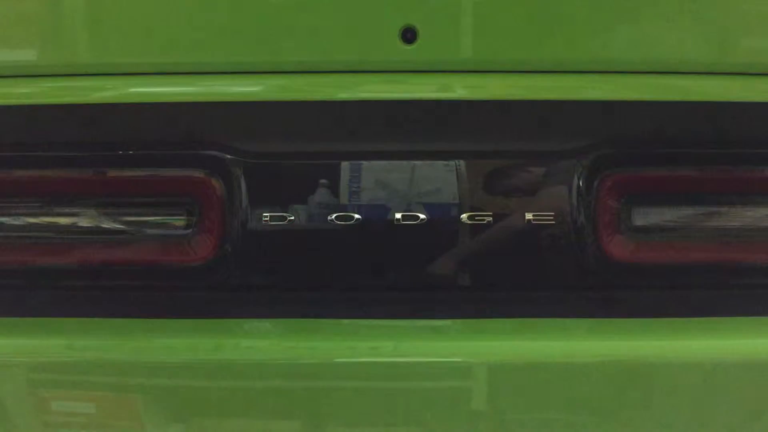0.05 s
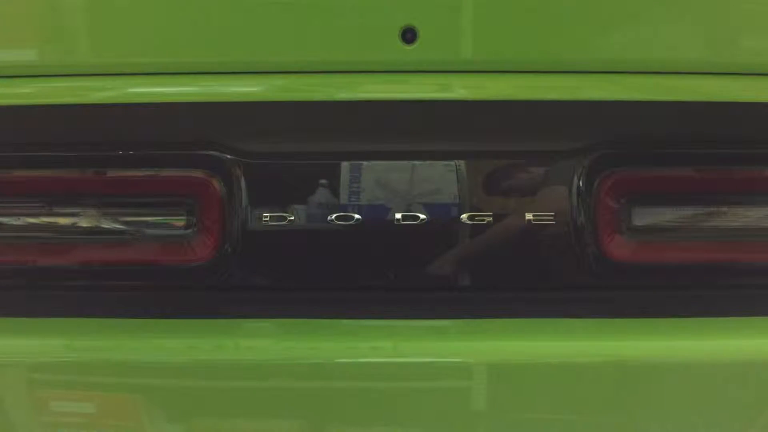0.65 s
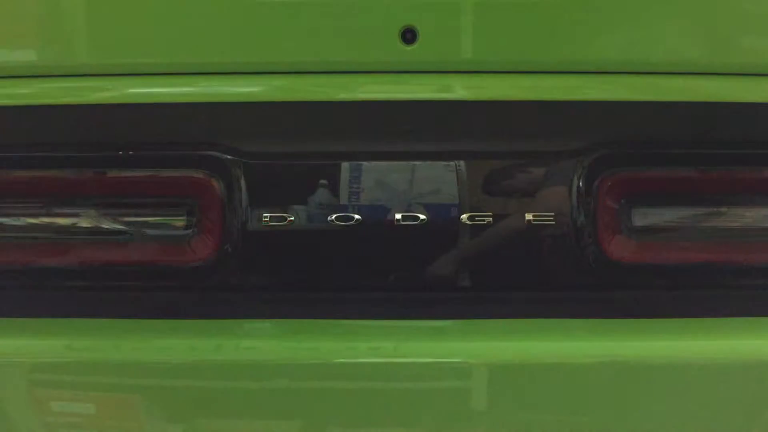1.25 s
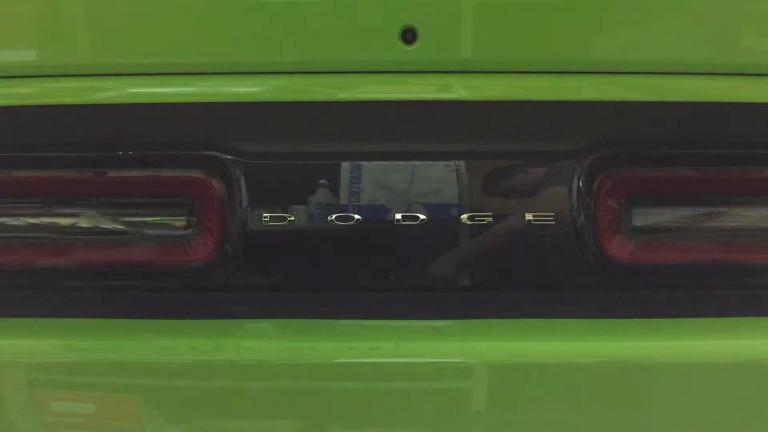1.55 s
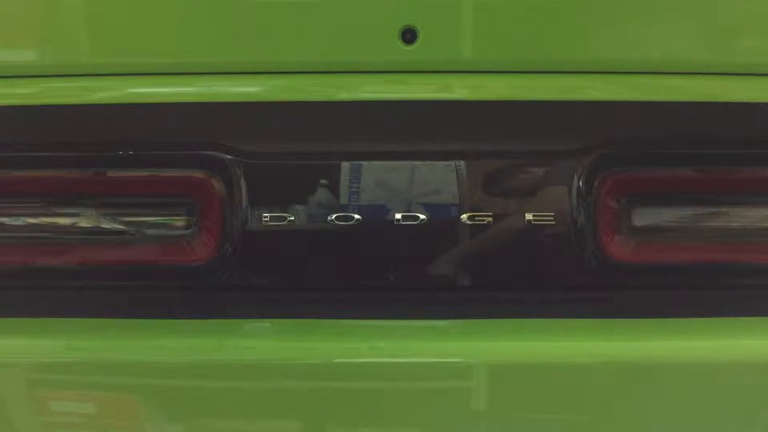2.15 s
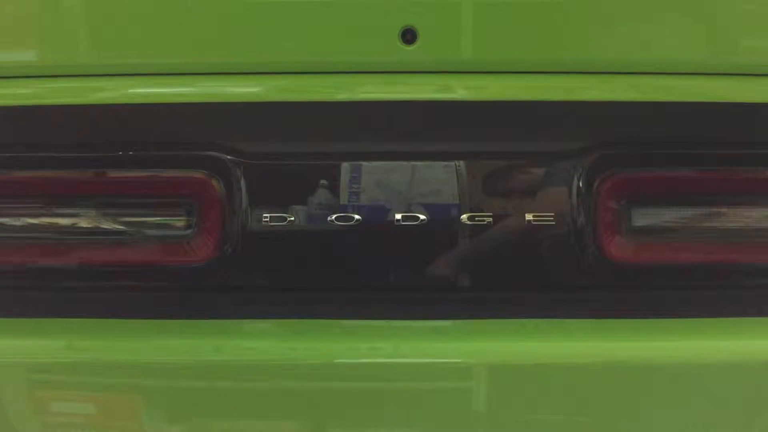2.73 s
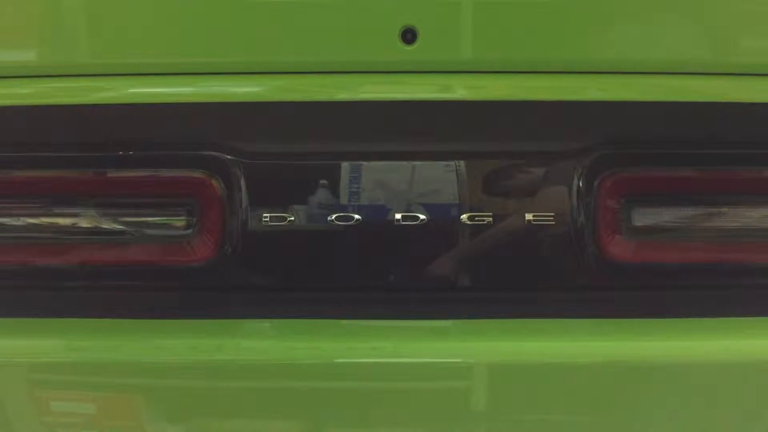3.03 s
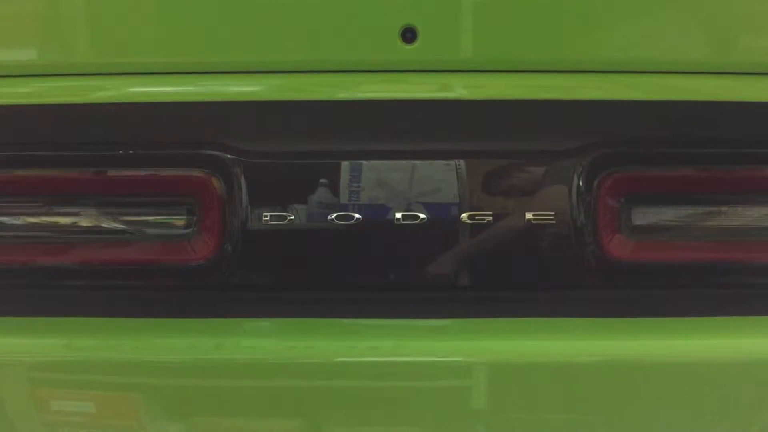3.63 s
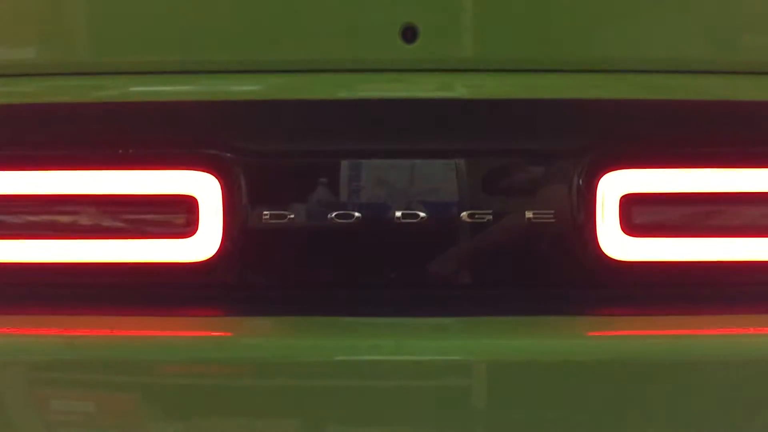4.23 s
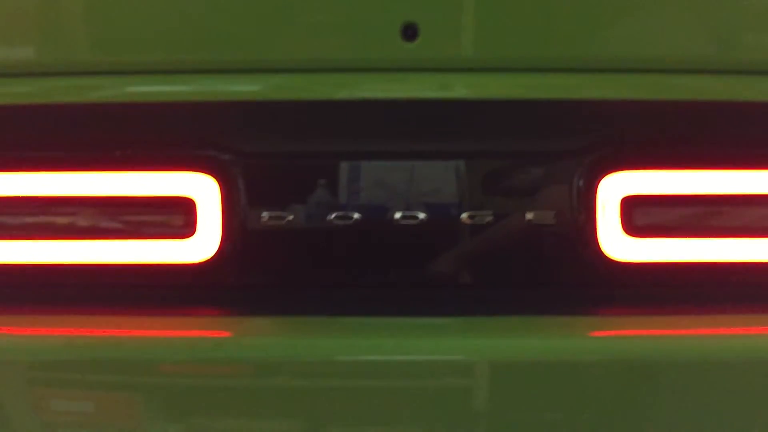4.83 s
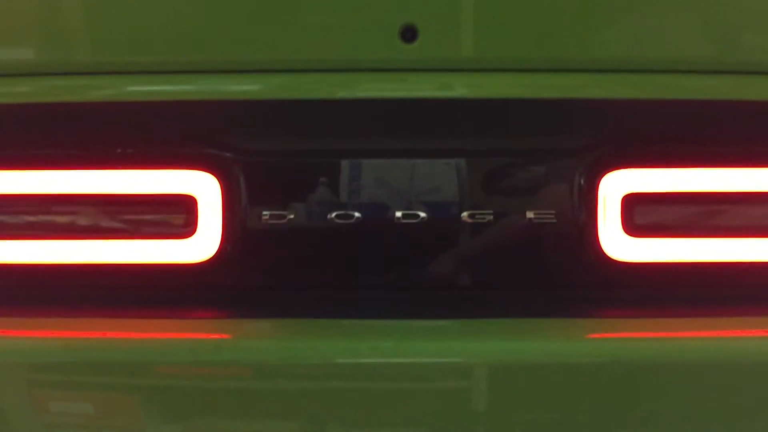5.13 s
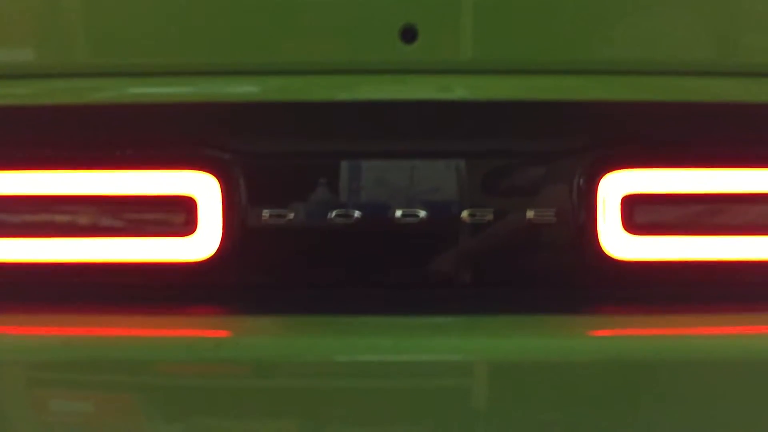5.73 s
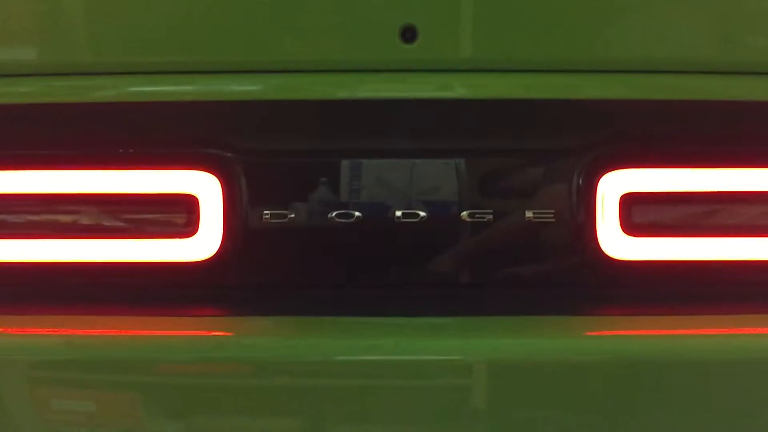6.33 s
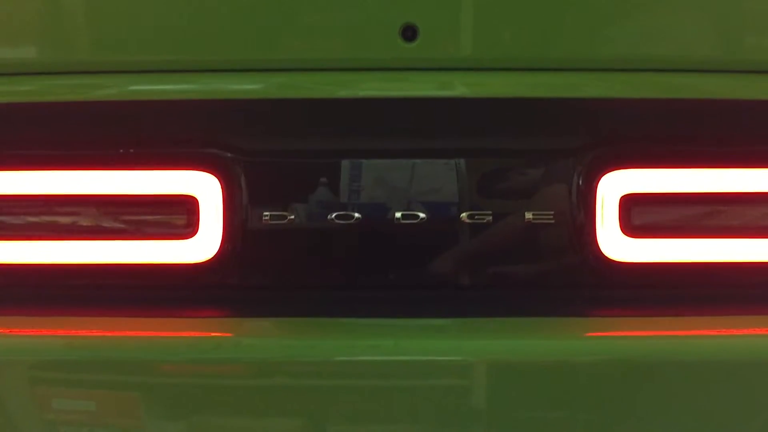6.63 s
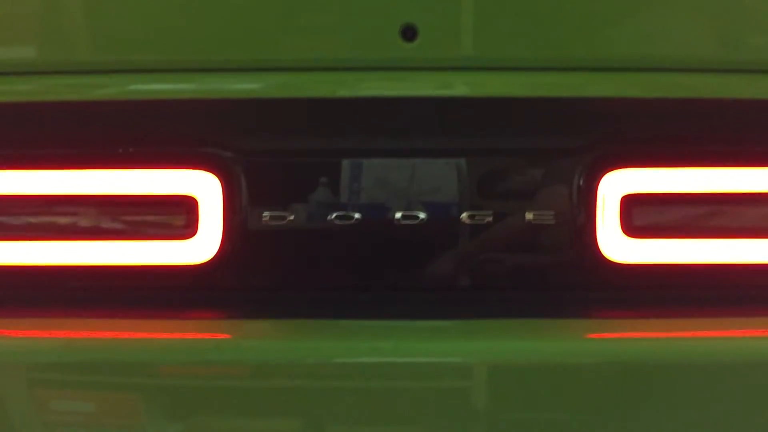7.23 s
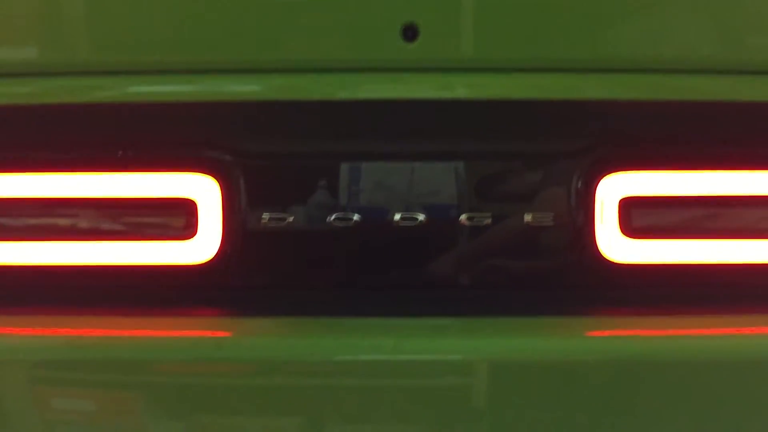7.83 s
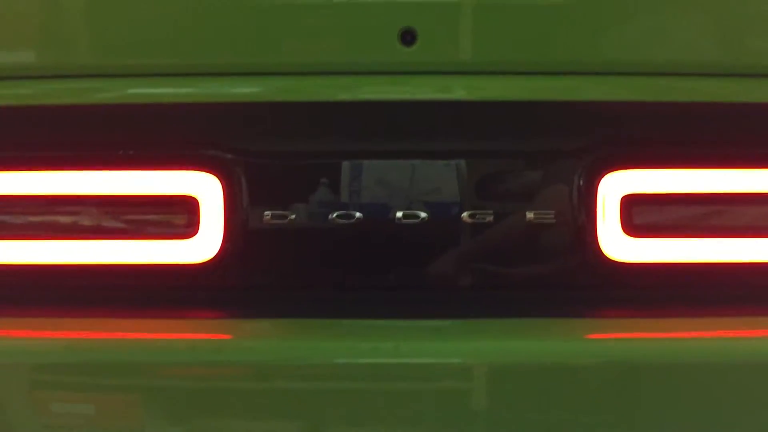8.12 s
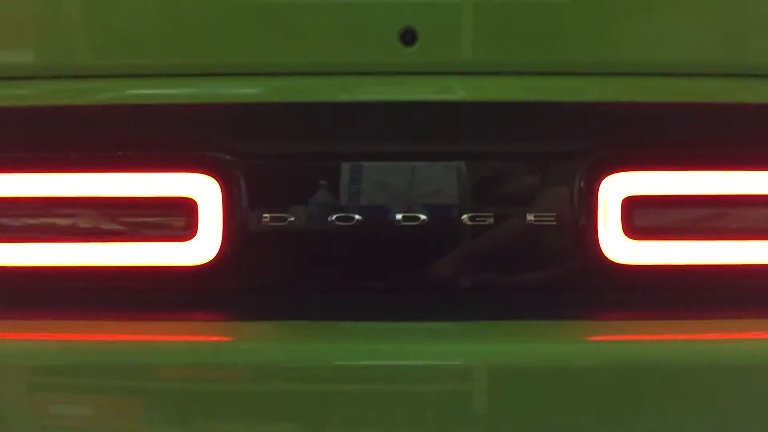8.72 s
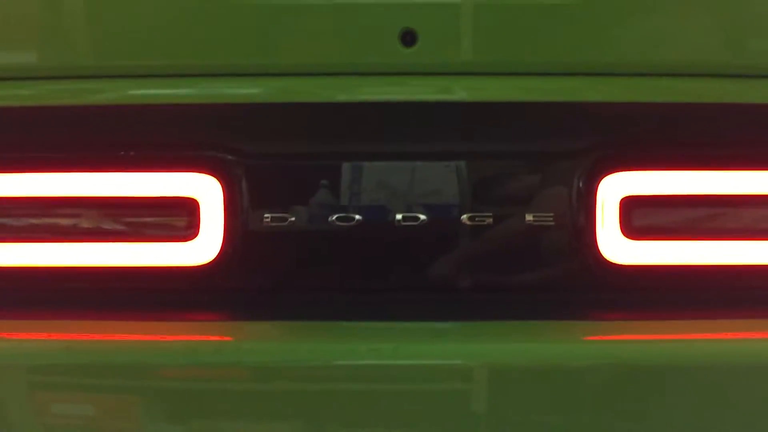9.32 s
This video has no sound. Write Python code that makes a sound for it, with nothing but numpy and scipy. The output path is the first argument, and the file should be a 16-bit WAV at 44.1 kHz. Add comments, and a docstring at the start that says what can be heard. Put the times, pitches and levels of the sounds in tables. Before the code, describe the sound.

A V8 car starts from cold, heard close behind the exhaust. At first there is only faint air, a high electrical whine and a low swelling drone. Then comes a clack and a short grinding crank, cut through by a burst of bassy, slightly distorted bangs. The engine surges, falls back and holds a loping, throaty fast idle that wavers gently in speed.

```python
"""A V8 car starts from cold, heard from just behind its tail. Over a quiet hum the electrics wake with a
swish and a thin whine, and a low drone swells. The starter clacks in and its gears grind through five
compressions. The first rich firings bang down the pipes and overload the microphone. Then the revs flare
and sink to a booming fast idle, whose strong cylinders rasp once every engine cycle."""
import sys
import numpy as np
from scipy import signal
from scipy.fft import rfft, irfft
from scipy.io import wavfile
from scipy.ndimage import uniform_filter1d

SR = 44100
rng = np.random.default_rng(int(sys.argv[2]) if len(sys.argv) > 2 else 0)


def file_out(sig):
    """Save sig as 16-bit WAV at sys.argv[1]."""
    # one column per channel
    cols = np.atleast_2d(sig).T
    # limit, then scale
    lim = np.clip(cols, -1, 1)
    pcm = np.round(lim * 32767).astype(np.int16)
    wavfile.write(sys.argv[1], SR, pcm)


N = 422037
T = np.arange(N) / SR


def undb(db):
    """Decibels to gain."""
    return 10 ** (np.asarray(db) / 20)


def unit(x):
    """Scale to rms 1."""
    return x / np.sqrt(np.mean(x ** 2))


def noise():
    """White noise."""
    return rng.standard_normal(N)


def curves(rows):
    """Each column of a table, joined by straight lines in time."""
    s, *columns = np.transpose(rows)
    return [np.interp(T, s, c) for c in columns]


def drift(rate):
    """A random wander of rms 1, with `rate` new values a second."""
    return unit(np.interp(T * rate, np.arange(4000), rng.standard_normal(4000)))


def swells(rows):
    """Smooth rises and dips of level in dB, summed."""
    return sum(db * np.exp(-((T - s) / half) ** 2) for s, half, db in rows)


def burst(s, rise, decay):
    """Envelope of a blow."""
    age = np.maximum(T - s, 0)
    return (1 - np.exp(-age / rise)) * np.exp(-age / decay)


def gate(start, attack, end, release):
    """Straight attack, hold, exponential release."""
    return np.clip((T - start) / attack, 0, 1) * np.exp(-np.maximum(T - end, 0) / release)


def tone(hz):
    """A sine that follows a pitch curve."""
    return np.sin(2 * np.pi * np.cumsum(hz) / SR)


def ring(x, hz, width_hz):
    """One resonance, gain 1 at its centre."""
    return signal.lfilter(*signal.iirpeak(hz, hz / width_hz, SR), x)


def steep(x, modes):
    """Resonances passed twice, with dark valleys between them."""
    return sum(undb(db) * ring(ring(x, hz, width), hz, width) for hz, width, db in modes)


def band(hz, width_hz):
    """A steep band of noise, rms 1."""
    return unit(ring(ring(noise(), hz, width_hz), hz, width_hz))


def highpass(x, hz):
    """Steep bass cut."""
    return signal.sosfilt(signal.butter(4, hz, "high", fs=SR, output="sos"), x)


def colour(x, points, size=2048):
    """Minimum-phase EQ through (Hz, dB) points; white noise keeps its level."""
    hz, db = np.transpose(points)
    f = np.maximum(np.arange(size // 2 + 1) * SR / size, 1)
    bass_rolloff = 1 + (hz[0] / f / 2) ** 2
    gain = unit(undb(np.interp(np.log(f), np.log(hz), db)) / bass_rolloff)
    cepstrum = irfft(np.log(gain))
    cepstrum[1:size // 2] *= 2
    cepstrum[size // 2 + 1:] = 0
    return signal.fftconvolve(x, irfft(np.exp(rfft(cepstrum))))[:N]


def walls(x, t60, wet_db):
    """Scattered echoes from the ground and nearby walls."""
    age = T[:SR // 2]
    tail = rng.standard_normal(len(age)) * np.exp(-np.log(1000) * age / t60) * (age > .004)
    return x + undb(wet_db) * signal.fftconvolve(x, tail / np.sqrt(np.sum(tail ** 2)))[:N]


# The dark bed of air. Each row: frequency in Hz, relative level in dB.
AIR_EQ = [(60, -1.5), (114, 0), (171, -17.5), (250, -1.5), (500, -16.5), (930, -9.5), (1550, -22),
          (1730, -14.5), (1900, -24), (3200, -26), (6000, -36.5), (14000, -42)]
# Background hums. Each row: centre in Hz, filter width in Hz, level in dB.
HUMS = [(96.2, 13, -55), (109.3, 9.3, -70.5), (245.2, 6.6, -65), (517, 11, -68.5)]
# The swell of the low drone. Each row: time in seconds, level in dB.
DRONE_SWELL = [(1.2, -64), (2.0, -52.5), (2.4, -46), (3.2, -49.5)]
# Scuffs and ticks. Each row: start and length in seconds, centre and filter width in Hz, level in dB.
SCUFFS = [(0.09, 0.058, 352, 60, -47.5), (0.322, 0.088, 1750, 510, -52.5), (1.174, 0.11, 2880, 910, -55),
          (1.253, 0.19, 2440, 1490, -55.5), (2.705, 0.075, 2860, 795, -61),
          (7.448, 0.056, 7840, 1220, -52.5), (7.662, 0.059, 8200, 1800, -51.5)]


def surroundings():
    """Still air, steady hums, a swelling drone and a few faint scuffs and ticks."""
    bed = undb(-53 + 0.78 * drift(5.28)) * colour(noise(), AIR_EQ)
    for hz, width, db in HUMS:
        bed += undb(db) * band(hz, width)
    drone = unit(tone(53.3 + 1.75 * drift(2.1)) * undb(2 * drift(9.9)))
    bed += undb(curves(DRONE_SWELL)[0]) * drone
    for s, length, hz, width, db in SCUFFS:
        bed += undb(db) * band(hz, width) * np.sin(np.pi * np.clip((T - s) / length, 0, 1))
    return bed


# The soft opening swish. Each row: frequency in Hz, relative level in dB.
SWISH_EQ = [(300, 0), (750, 5), (1200, -1), (15000, -22.5)]
# The thin whine of the electrics. Each row: pitch in Hz, relative level in dB.
WHINE_TONES = [(3903, -68), (7850, -76.5), (11192, -75), (11531, -68), (11951, -97), (12161, -85),
               (13114, -79)]


def electrics():
    """The electrics wake: a short swish, then a wavering whine that stops before cranking."""
    swish = undb(-45) * colour(noise(), SWISH_EQ) * np.interp(T, [.13, .2, .255, .3], [0, 1, 1, 0])
    whine = sum(np.sqrt(2) * undb(db - 6 + 1.9 * drift(23.5)) * tone(hz + 9 * drift(150))
                for hz, db in WHINE_TONES)
    hiss = undb(-68.5) * band(12040, 2200)
    return swish + (whine + hiss) * np.interp(T, [.22, .28, 2.66, 2.7], [0, 1, 1, 0])


# The starter's surge over each compression. Each row: time in seconds, boost in dB.
COMPRESSIONS = [(3.247, 4.5), (3.367, 6.5), (3.506, 5.5), (3.627, 6), (3.733, 5)]
# The grind of the gear teeth. Each row: frequency in Hz, relative level in dB.
GRIND_EQ = [(200, -31), (380, -26), (460, -8), (640, -15), (900, -5.5), (1050, 2), (1380, -24), (1560, -17),
            (1850, -14), (3050, -13), (6500, -22.5), (15000, -44)]
# The ring of starter and bell housing. Each row: centre in Hz, width in Hz, relative level in dB.
HOUSING_MODES = [(905, 16, -2.5), (1300, 49, -3), (1520, 170, -11), (2194, 26, -13.5), (2590, 51, -13.5),
                 (2980, 32, -18), (4270, 23, -15)]
# The clack of the pinion. Each row: frequency in Hz, relative level in dB.
CLACK_EQ = [(150, -11.5), (300, -17), (900, -8.5), (2200, -3.5), (7200, -12), (15000, -31)]


def starter():
    """The pinion slams in; its teeth grind on the ring gear, labouring at each compression."""
    start_s, end_s, sag_db_per_s = 3.16, 3.935, 1
    age = np.clip(T, start_s, end_s) - start_s
    surge_db = swells([(s, .04, db) for s, db in COMPRESSIONS])
    level_db = -30 + surge_db - sag_db_per_s * age
    mesh_hz = 804 + 420 * age + 14 * surge_db  # rises with speed, swings with each compression
    teeth = np.cumsum(mesh_hz * (1 + .025 * drift(200))) / SR
    scrape = noise() * unit(np.exp(-(teeth % 1) / 0.47) * undb(1.35 * drift(250)))
    housing = sum(undb(db) * ring(scrape, hz, width) for hz, width, db in HOUSING_MODES)
    # the gears sing loudest while they drag the cold engine up to speed
    whine_db = np.interp(T, [3.18, 3.24, 3.39, 3.52], [-14, -3, -3, -11])
    whine = np.sin(2 * np.pi * teeth) * undb(whine_db + 3 * drift(70))
    gears = undb(-4) * colour(scrape, GRIND_EQ) + undb(-9.5) * unit(housing) + whine
    chuff = band(61.5, 28) * np.interp(T, [3.28, 3.33], [.3, 1])  # unfired air leaves the tailpipes
    slam = np.interp(T, [3.154, 3.168], [0, 1]) ** 2 * burst(3.154, rise=0.0016, decay=0.043)
    clack = undb(-18.5) * colour(noise() * slam, CLACK_EQ)
    turning = undb(level_db) * gate(start_s, attack=.015, end=end_s, release=.033)
    return walls((gears + undb(-14.5) * chuff) * turning + clack, t60=0.21, wet_db=-3.5)


# The first bangs. Each row: start in seconds, relative level in dB, decay in seconds.
BANGS = [(3.779, -9.5, 0.0042), (3.798, -10.5, 0.016), (3.820, -4, 0.0046), (3.832, -19, 0.0026),
         (3.864, -7, 0.0039), (3.8733, 6.5, 0.0033), (3.889, -14, 0.0023), (3.946, -24.5, 0.036)]
# Their bass-heavy bark. Each row: frequency in Hz, relative level in dB.
BANG_EQ = [(120, 6.5), (300, -6), (520, -15.5), (1050, -2.5), (1450, -11.5), (1850, -2.5), (2300, -25.5),
           (2900, -16.5), (5000, -32), (14000, -38.5)]


def first_firings():
    """Rich mixture bangs down the cold pipes."""
    blows = sum(undb(db) * burst(s, 0.00053, decay) for s, db, decay in BANGS)
    bangs = undb(4) * colour(noise() * blows, BANG_EQ)
    return walls(bangs, t60=.25, wet_db=-14)


# The hunting idle. Each row: time in seconds, firings per second, relative load in dB.
IDLE_HUNT = [(5.55, 86.51, -16.8), (6.05, 86.1, -15.1), (6.4, 91.42, -13.6), (6.9, 90.58, -15.1),
             (7.62, 88.0, -18.8), (8.0, 90.19, -14.1), (8.55, 89.39, -16.1), (8.85, 91.44, -14.5),
             (9.5, 91.63, -16.3)]
# The throttle shuts as the revs sink, then opens to catch them.
# Each row: centre in seconds, half length in seconds, change of load in dB.
THROTTLE = [(4.42, 0.12, -4.5), (4.68, 0.42, 4)]
CATCH_S, CATCH_HZ, PEAK_HZ = 3.776, 55, 127  # when the engine catches; first and highest firing rate
IDLE_HZ, IDLE_LOAD_DB = 90, -15.5


def revs():
    """The revs flare, sink and hunt: firing rate in Hz, load in dB and the idle's pull in Hz a second."""
    sink_s, settle_s = 4.085, .45
    idle_hz, idle_db = curves(IDLE_HUNT)
    climb_hz = np.interp(T, [3.815, 4.008], [CATCH_HZ, PEAK_HZ])
    hz = idle_hz + (climb_hz - idle_hz) * np.exp(-np.maximum(T - sink_s, 0) / settle_s)
    load_db = idle_db - IDLE_LOAD_DB + swells(THROTTLE)
    pull = uniform_filter1d(np.gradient(idle_hz) * SR, int(.3 * SR))
    return hz, load_db, pull


def drive(hz, load_db, rich_db, idle_db, per_load, per_octave):
    """Level of an exhaust layer in dB: loud while the mixture is rich, then following load and speed."""
    hold_s, release_s = 0.17, 0.065
    running_db = idle_db + per_load * load_db + per_octave * np.log2(hz / IDLE_HZ)
    calm = np.clip((T - CATCH_S - hold_s) / release_s, 0, 1)
    return rich_db + calm * (running_db - rich_db)


# The cylinders' voices in firing order, levels relative.
# Each row: thud in dB, thud delay in firing periods, pipe ring in dB, crack in dB.
CYLINDERS = [(4.5, 0.02, 12.5, 11), (2.5, 0.098, 3, -17.5), (-7.5, 0.12, -32, 9.5), (8, 0.13, 3, 0.5),
             (-6.5, 0.032, -3, 4), (1.5, 0.099, 13, -17.5), (10, 0.1, 6.5, 4), (-15.5, 0.017, 3, 9)]
# Tailpipe resonances: low thud, middle ring, high crack.
# Each row: centre in Hz, filter width in Hz, relative level in dB.
THUD_MODES = [(289.8, 32.6, 7), (321, 48.7, 4), (464.3, 22.4, -2.5), (574, 19, -2), (672, 31, -2),
              (799, 58, -4)]
RING_MODES = [(1055, 235, 0)]
CRACK_MODES = [(1820, 260, 0), (2830, 360, -4), (6160, 260, -15)]
# The hiss of flowing gas. Each row: frequency in Hz, relative level in dB.
GAS_EQ = [(380, -19), (525, -18.5), (620, -10), (870, -3), (1300, -10.5), (2100, -15.5), (3300, -22),
          (4800, -26), (6200, -27.5), (10000, -33.5), (15000, -36.5)]


def valve_pulses(firings):
    """Each valve sends its cylinder's pulse down the pipes: returns a low thud and a bright rasp."""
    valves = firings + 0.0973  # the valve opens just ahead of the boom
    index, phase = valves.astype(int), valves % 1
    thud_db, delay, ring_db, crack_db = np.array(CYLINDERS)[index % len(CYLINDERS)].T
    scatter_db = (rng.standard_normal((2000, 3)) * [1.5, 1.7, 1.4])[index].T
    # header pipes of unequal length bring the thuds out unevenly
    late_pulses = np.diff(np.floor(valves - delay), prepend=0)
    thud = highpass(steep(late_pulses * undb(thud_db + scatter_db[0]), THUD_MODES), 180)
    # a short rush of gas after each pulse makes the higher resonances ragged
    blast = unit(np.diff(index, prepend=0)) + unit(noise() * np.exp(-phase / .22))
    pipe_ring = steep(blast * undb(ring_db + scatter_db[1]), RING_MODES)
    crack = steep(blast * undb(crack_db + scatter_db[2]), CRACK_MODES)
    gas = colour(noise() * (1 + .5 * np.exp(-phase / 1.2)), GAS_EQ)
    rasp = undb(-.5) * unit(pipe_ring) + undb(-9.5) * unit(crack) + undb(-4.5) * unit(gas)
    return unit(thud), walls(rasp, t60=.25, wet_db=-9.5)


# The lope of two unevenly firing banks. Each row: harmonic of the engine cycle, relative level in dB.
LOPE_HARMONICS = [(4, -2), (5, -18.5), (6, 4), (7, 5.5), (9, 7), (10, 4.5), (11, 1), (14, -10), (15, -7),
                  (16, -9.5)]
# Stumbles that deepen the lope. Each row: centre in seconds, half length in seconds, boost in dB.
STUMBLES = [(4.36, 0.29, 8), (5.8, .4, 5)]
# How hard each layer is driven.
# Each row: gain in dB while rich, gain in dB at idle, dB per dB of load, dB per octave of speed.
BOOM_DRIVE = (-5.5, -15.5, 1, -14)
LOPE_DRIVE = (-22, -43, 0.16, -1.5)
THUD_DRIVE = (-21.5, -41, 0.87, 9.5)
RASP_DRIVE = (-17, -39.5, 0.83, 12)


def exhaust():
    """Eight unequal cylinders: a boom at the firing rate, a lope around it, a thud and rasp per firing."""
    hz, load_db, pull = revs()
    boom_db = drive(hz, load_db, *BOOM_DRIVE)
    lope_db = drive(hz, load_db, *LOPE_DRIVE) + swells(STUMBLES)
    thud_db = drive(hz, load_db, *THUD_DRIVE)
    # the rasp comes up as the pipes warm, and while the idle control pulls the revs up
    cold = (1 - np.tanh((T - 5.27) / 0.12)) / 2
    rasp_db = drive(hz, load_db, *RASP_DRIVE) + 0.1 * pull - 4 * cold
    firings = np.cumsum(hz * (T > CATCH_S)) / SR
    cycles = firings / len(CYLINDERS)
    boom = np.sqrt(2) * np.sin(2 * np.pi * firings) * undb(boom_db + 0.5 * drift(22))
    lope = sum(undb(db + 2 * drift(9)) * np.sin(2 * np.pi * (k * cycles + rng.random() + .059 * drift(6)))
               for k, db in LOPE_HARMONICS)
    lope += unit(highpass(ring(noise(), 87, 55), 32))  # rumble between the harmonics
    thud, rasp = valve_pulses(firings)
    running = np.clip((T - CATCH_S) / 0.016, 0, 1)
    return running * (boom + lope * undb(lope_db) + thud * undb(thud_db) + rasp * undb(rasp_db))


def scene():
    """Everything at the microphone, in mono."""
    return (exhaust() + first_firings() + starter() + electrics() + surroundings())[None]


def record(dry):
    """The microphone flattens the loudest peaks; the top is cut."""
    ceiling, top_hz = .7, 15400
    clipped = dry / (1 + (dry / ceiling) ** 4) ** (1 / 4)
    return signal.sosfilt(signal.ellip(8, .2, 70, top_hz, fs=SR, output="sos"), clipped)


dry = scene()
out = record(dry)
file_out(out)
```